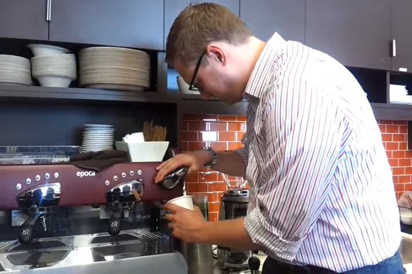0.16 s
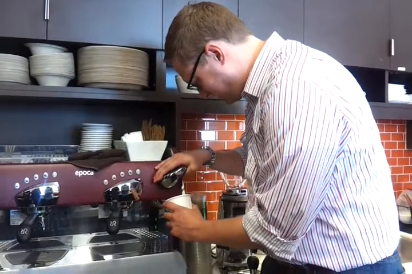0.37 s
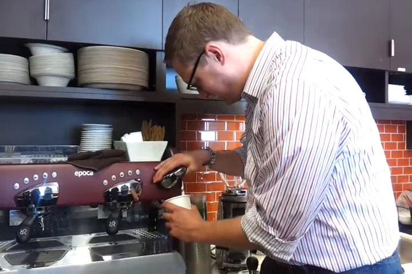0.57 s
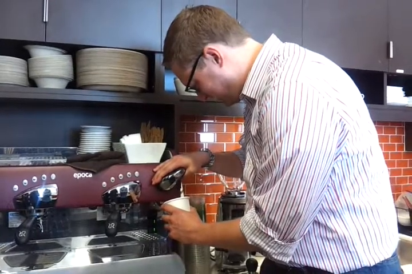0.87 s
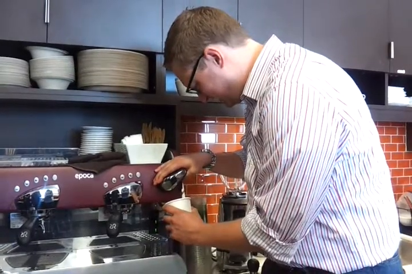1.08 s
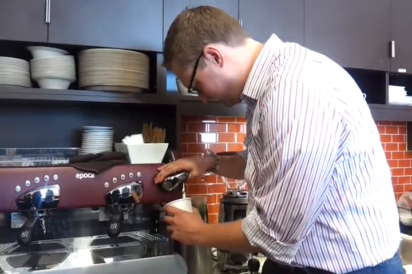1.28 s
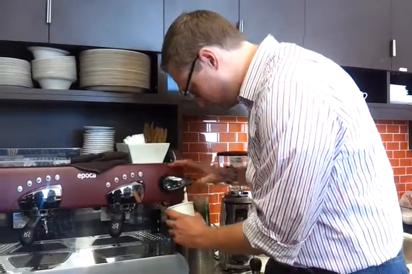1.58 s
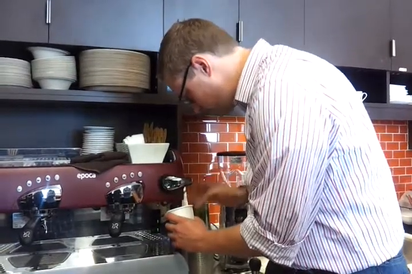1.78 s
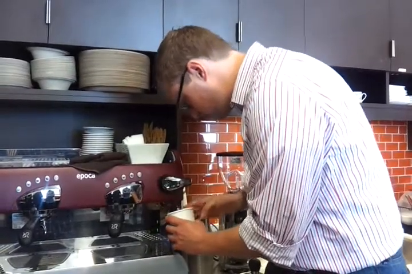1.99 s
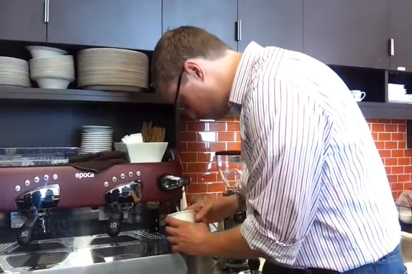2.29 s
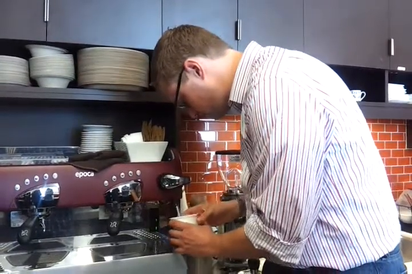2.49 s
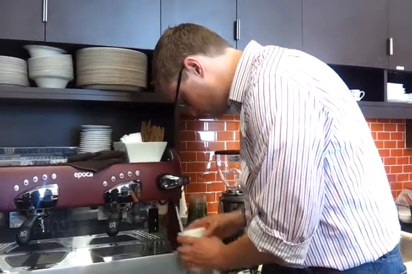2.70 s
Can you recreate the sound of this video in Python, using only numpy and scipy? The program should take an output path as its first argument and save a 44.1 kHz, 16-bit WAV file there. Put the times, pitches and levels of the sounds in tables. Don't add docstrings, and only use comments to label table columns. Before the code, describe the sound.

Loud milk steaming, shrill at first then a bubbling roar, cut off before a few faint taps

```python
import sys
import numpy as np
from scipy import signal
from scipy.fft import rfft, irfft, next_fast_len
from scipy.io import wavfile

SR = 44100
rng = np.random.default_rng(int(sys.argv[2]) if len(sys.argv) > 2 else 0)


def level_to_linear(level):
    exponent = np.asarray(level, float) / 20
    return 10 ** exponent


def pcm_store(signal):
    levels = np.round(np.clip(np.atleast_2d(signal), -1, 1) * 32767)
    wavfile.write(sys.argv[1], SR, levels.astype(np.int16).T)


N = 125685


def in_time(rows):
    s, *columns = np.transpose(rows)
    return [np.interp(np.arange(N) / SR, s, c) for c in columns]


def rms_one(x):
    return x / np.sqrt(np.mean(x ** 2) + 1e-20)


def drift(rate_hz):
    r = np.exp(-80 * np.pi * rate_hz / SR)
    white = rng.standard_normal(N // 40 + 2002)
    slow = signal.lfilter([1], [1, -2 * r, r * r], white)[2000:]
    return np.interp(np.arange(N) / 40, np.arange(len(slow)), rms_one(slow))


def resonance(x, hz, width_hz):
    r = np.exp(-np.pi * width_hz / SR)
    poles = [1, -2 * r * np.cos(2 * np.pi * hz / SR), r * r]
    return signal.lfilter([(1 - r * r) / 2, 0, (r * r - 1) / 2], poles, x)


def narrow_noise(hz, width_hz):
    r = np.exp(-np.pi * width_hz / SR)
    slow = signal.lfilter([1], [1, -2 * r, r * r], rng.standard_normal((2, N)))
    phase = 2 * np.pi * np.cumsum(hz * np.ones(N)) / SR
    return rms_one(slow[0] * np.cos(phase) + slow[1] * np.sin(phase))


def swell(s, length):
    return np.exp(-((np.arange(N) / SR - s) / (length / 2)) ** 2)


def banded_noise(spectrum, low_hz, swing, shared_db, patchy_db):
    hz_at, db_at = np.transpose(spectrum)
    edges = low_hz * 2 ** (np.arange(30) / 3)
    edges = edges[edges < 9000]
    white, together = rng.standard_normal((2, N)), drift(25.0)
    out, power = 0, 0
    for k, (low, high) in enumerate(zip(edges, edges[1:])):
        hz = np.sqrt(low * high)
        band_pass = signal.butter(2, [low, high], "band", fs=SR, output="sos")
        band = signal.sosfilt(band_pass, white[k % 2])
        gain = level_to_linear(np.interp(np.log(hz), np.log(hz_at), db_at))
        power += gain ** 2 * (high - low) * 2 / SR
        flicker_db = shared_db * together + patchy_db * drift(8.4)
        out = out + band * gain * level_to_linear(swing(hz) + flicker_db)
    return out / np.sqrt(power)


def jet():
    # (time [s], level [dB])
    flow = [(0.0, -13), (0.062, -17), (0.452, -17.5), (0.458, -22), (0.662, -22), (0.814, -18),
            (0.838, -22.5), (0.978, -19), (1.252, -19), (1.428, -15), (1.622, -40.5), (1.666, -68),
            (1.75, -70)]
    # (frequency [Hz], density [dB per Hz])
    jet_colour = [(350, -61), (600, -9), (976, -1), (1100, -4.5), (2040, -1), (3580, -3.5), (3940, 0.5),
                  (5460, -11), (7500, -19.5), (9750, -61), (16500, -120)]
    flow_db, = in_time(flow + [(flow[-1][0] + .05, -110)])
    sink_s, sink_takes_s = 0.48, 0.04
    shallow = 1 / (1 + np.exp((np.arange(N) / SR - sink_s) / (sink_takes_s / 4)))

    def swing(hz):
        follows = np.interp(np.log(hz), np.log([800, 6000]), [0.18, 1.06])
        bass_loss_db = 8 / (1 + (hz / 1160) ** 8)
        dip_db = 3.5 * np.exp(-(np.log(hz / 2110) / 0.21) ** 2)
        return (flow_db + 20) * follows - shallow * (bass_loss_db + dip_db)

    return level_to_linear(-18) * banded_noise(jet_colour, 502.2, swing, shared_db=0.45, patchy_db=1.27)


def screech():
    # (time [s], level [dB], pitch [Hz], lower band level [dB], lower band pitch [Hz])
    shriek = [
        (0, -16, 3337, -11.5, 1610),
        (.07, -11, 3200, -21.5, 1451),
        (.13, -11.5, 3100, -15.5, 1400),
        (.24, -11.5, 3120, -20, 1336),
        (.3, -14, 3200, -18.5, 1294),
        (.36, -14.5, 3450, -15, 1600),
        (.41, -23, 2880, -18.5, 1600),
        (.5, -18, 2860, -39.5, 1523),
        (.6, -34, 2860, -42, 1496),
    ]
    # (frequency [Hz], width [Hz], level under the main band [dB])
    shriek_tops = [(4290, 560, -11), (5210, 950, -13), (6100, 810, -14)]
    end = shriek[-1]
    faded = (end[0] + .15, -60, end[2], -60, end[4])
    level_db, hz, under_db, under_hz = in_time(shriek + [faded])
    upper = level_to_linear(-2 + 0.47 * drift(43.0)) * narrow_noise(hz, 370)
    for top_hz, width_hz, db in shriek_tops:
        upper = upper + level_to_linear(db + 0.73 * drift(12.0)) * narrow_noise(top_hz, width_hz)
    under = level_to_linear(under_db - 5 + 2.8 * drift(23.0)) * narrow_noise(under_hz, 225)
    return level_to_linear(level_db) * upper + under


def roar():
    # (time [s], level [dB], pitch [Hz])
    cloud = [(.36, -39, 997), (.46, -20.5, 959), (.6, -23, 933.3), (0.646, -10, 893), (0.682, -22, 900),
             (.73, -30.5, 930), (.8, -22, 950), (0.872, -13.5, 929), (0.919, -22, 962.4), (1.2, -22, 941.7),
             (1.332, -27.5, 946), (1.392, -11.5, 929.3), (1.432, -18.5, 952), (1.49, -13, 904.5),
             (1.531, -35, 950), (1.63, -24.5, 945), (1.66, -40, 950), (1.701, -56, 945)]
    before, after = (cloud[0][0] - .1, -60, 900), (cloud[-1][0] + 0.12, -60, 900)
    level_db, hz = in_time([before] + cloud + [after])
    return level_to_linear(level_db - 2.5) * narrow_noise(hz, 260)


def squeals():
    # (time [s], pitch [Hz], level [dB], length [s], glide [Hz/s])
    squeal_list = [(0.41, 2850, -20.5, 0.084, -3.5), (.79, 1700, -22, 0.032, 8),
                   (1.075, 1600, -22.5, 0.029, -0.5), (1.364, 1420, -18.5, 0.082, 1),
                   (1.41, 2800, -21.5, 0.15, 2.5), (1.26, 1300, -21, .07, 0.5),
                   (1.045, 4000, -21.5, 0.33, 0), (1.47, 2200, -20, 0.072, -3000),
                   (1.56, 1100, -25.5, .14, -1500), (1.66, 1500, -36.5, 0.22, -800),
                   (0.69, 3800, -21, 0.044, 1), (.62, 820, -20.5, 0.14, 1.5)]
    t, out = np.arange(N) / SR, 0
    for s, hz, db, length, glide in squeal_list:
        pitch_hz = hz + glide * np.clip(t - s, -length, length)
        out = out + level_to_linear(db) * swell(s, length) * narrow_noise(pitch_hz, 220)
    return out


def gulps():
    # (time [s], pitch [Hz], level [dB], length [s])
    gulp_list = [
        (.58, 633.4, -33, 0.17),
        (1.096, 518, -33.5, .15),
        (1.566, 558, -33, 0.15),
        (1.67, 358.6, -35, .12),
    ]
    return sum(level_to_linear(db) * swell(s, length) * narrow_noise(hz, 220) for s, hz, db, length in gulp_list)


def cup(x):
    # (frequency [Hz], width [Hz], level [dB])
    cup_modes = [(875, 41, -2.5), (1006, 16.7, 2.5), (1157, 25, -4.5), (1211, 41, 4), (1442, 18.3, 1.5),
                 (1601, 14, 4.5), (1800, 64, -4), (2032, 17, 2), (2460, 25, -23), (2809, 41, -1),
                 (2970, 13, -7), (3130, 8.3, 0), (3450, 55, -7.5), (4170, 34, -0.5)]
    # (frequency [Hz], width [Hz], level [dB])
    steel_modes = [(3525, 8.3, 4.5), (3880, 40, -2.5), (3886, 8.3, -3), (4263, 27, -6), (4910, 45, -6),
                   (5334, 85, 1.5), (5860, 38, -6), (6290, 27, -14.5)]
    x = x + 1.18 * sum(level_to_linear(db) * resonance(x, hz, w) for hz, w, db in cup_modes + steel_modes)
    floor = signal.butter(4, 740, "high", fs=SR, output="sos")
    return signal.sosfilt(floor, x) + 0.1 * x


def ticks():
    # (time [s], peak level [dB], metal ring [dB], scatter [s])
    tick_list = [
        (1.771, -20.5, 3.5, 0.0073),
        (1.894, -23.5, -14, .012),
        (2.2765, -30.5, -7, 0.02),
        (2.468, -36, -12, 0.022),
        (2.549, -31, -7, 0.013),
        (2.6594, -41, -21, .012),
    ]
    # (frequency [Hz], level [dB], decay by 60 dB [s])
    metal_modes = [(3200, -12, .012), (3740, -16, .012), (4850, 0, .02), (5250, -7, .012)]
    t, noise = np.arange(N) / SR, rng.standard_normal(N)
    hits, rung = 1e-18, 1e-18
    for s, db, ring_db, scatter in tick_list:
        dying = (t >= s) * np.exp(-np.abs(t - s) / max(scatter, .002))
        burst = level_to_linear(db - 8.5) * noise * dying
        hits = hits + burst
        rung = rung + level_to_linear(ring_db) * burst
    crack = signal.sosfilt(signal.butter(2, [1600, 5300], "band", fs=SR, output="sos"), hits)
    return crack + 6 * sum(level_to_linear(db) * resonance(rung, hz, 1.3 / t60) for hz, db, t60 in metal_modes)


def room(x):
    t60_s, wall_cut_hz = 0.57, 2940
    size = next_fast_len(N + SR)
    z, out = np.exp(-2j * np.pi * np.arange(size // 2 + 1) / size), 0
    dull = np.exp(-2 * np.pi * wall_cut_hz / SR)
    for k, lag in enumerate((rng.uniform(.02, .055, 10) * SR).astype(int)):
        loop = level_to_linear(-60 * lag / SR / t60_s) * (1 - dull) / (1 - dull * z) * z ** lag
        out = out + (-1) ** k * loop / (1 - loop)
    return irfft(rfft(x, size) * out, size)[:N]


def background():
    # (frequency [Hz], density [dB per Hz])
    air_colour = [(25, -21.5), (190, -2), (500, -3), (900, -13), (1600, -15.5), (3000, -24), (5500, -28.5),
                  (7500, -39)]
    # (frequency [Hz], width [Hz], level [dB])
    drone_bands = [(119.9, 8, -46.5), (198, 59, -40.5), (473.6, 20, -45)]
    air = level_to_linear(-34) * banded_noise(air_colour, 22.66, lambda hz: 0, shared_db=1.08, patchy_db=0.6)
    return air + sum(level_to_linear(db) * narrow_noise(hz, w) for hz, w, db in drone_bands)


def scene():
    milk = jet() + level_to_linear(-4.0) * (screech() + roar() + squeals())
    near, touch = cup(milk) + gulps(), ticks()
    echo = level_to_linear(-6.5) * room(near + 0.94 * touch) / 2
    return (near + touch + echo + background())[None]


def band_limit(x):
    return signal.sosfilt(signal.butter(12, 15850, fs=SR, output="sos"), x)


def record(dry):
    input_top, clip_top = .66, .715
    mirror_hz, edge_hz = 16000, 9200
    x = np.clip(dry, -input_top, input_top)
    mirror = level_to_linear(-20) * x * np.cos(2 * np.pi * mirror_hz * np.arange(N) / SR)
    above = signal.cheby2(8, 60, [mirror_hz / 2, edge_hz], "band", fs=SR, output="sos")
    mirror = signal.sosfilt(above, mirror)
    x = signal.sosfilt(signal.cheby2(10, 50, edge_hz, fs=SR, output="sos"), x)
    x = signal.sosfilt(signal.cheby2(8, 40, 7950, fs=SR, output="sos"), x) + mirror
    return band_limit(np.clip(x, -clip_top, clip_top))


dry = scene()
out = record(dry)
pcm_store(out)
```